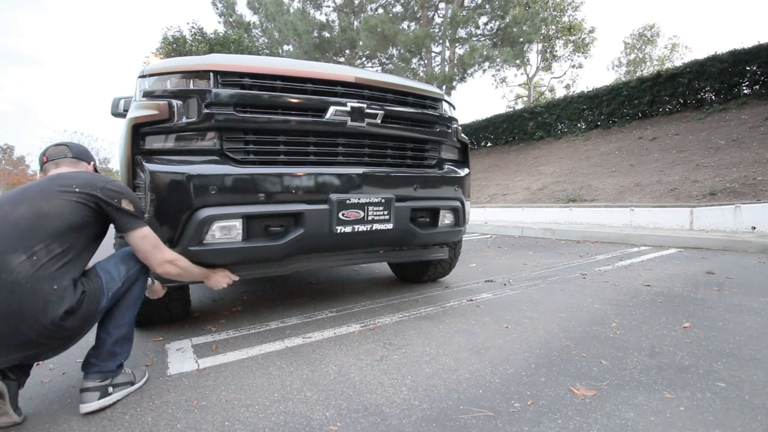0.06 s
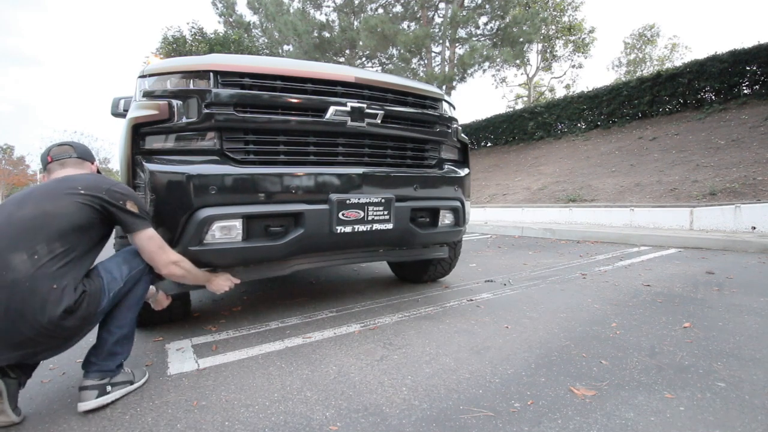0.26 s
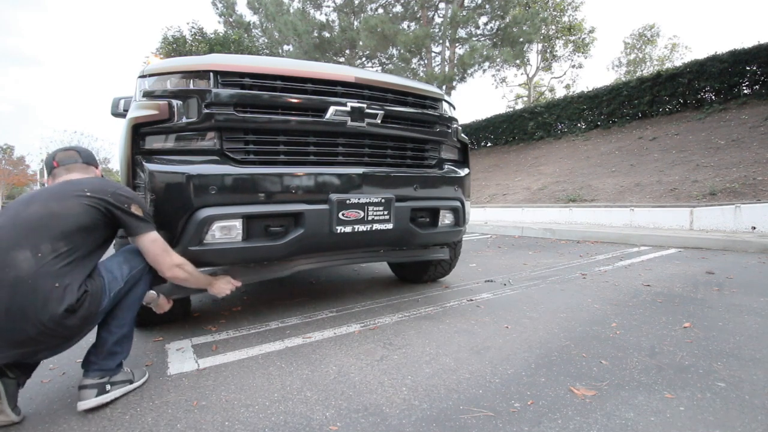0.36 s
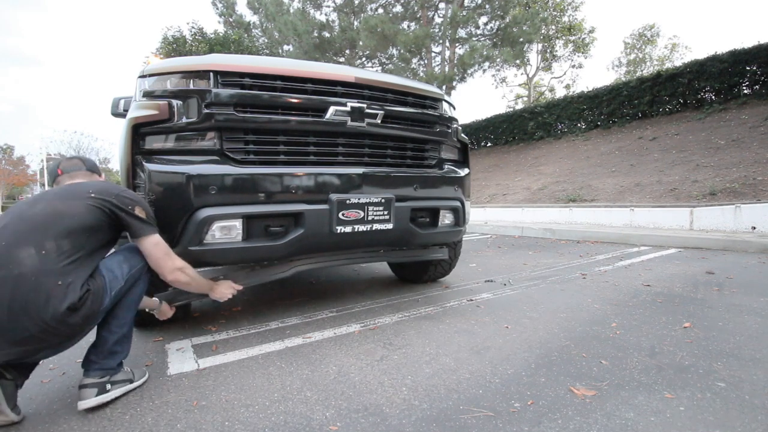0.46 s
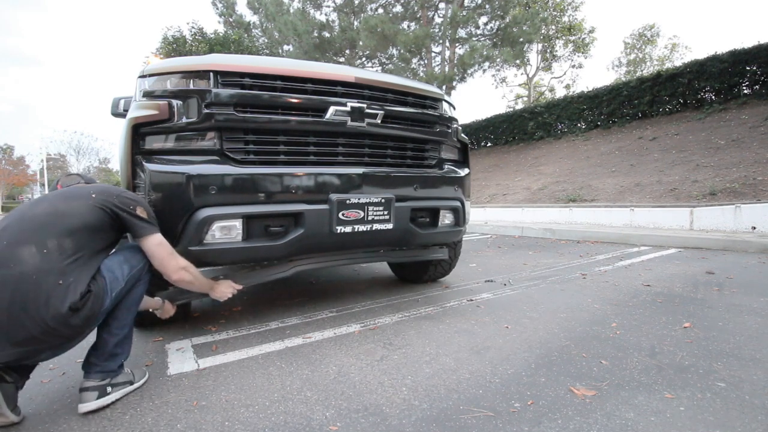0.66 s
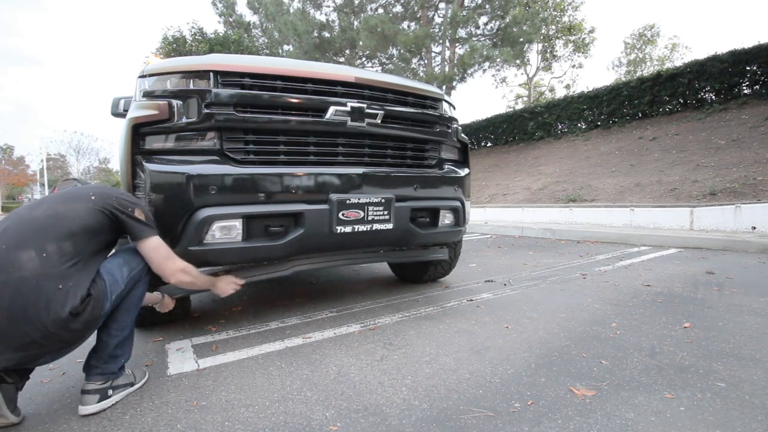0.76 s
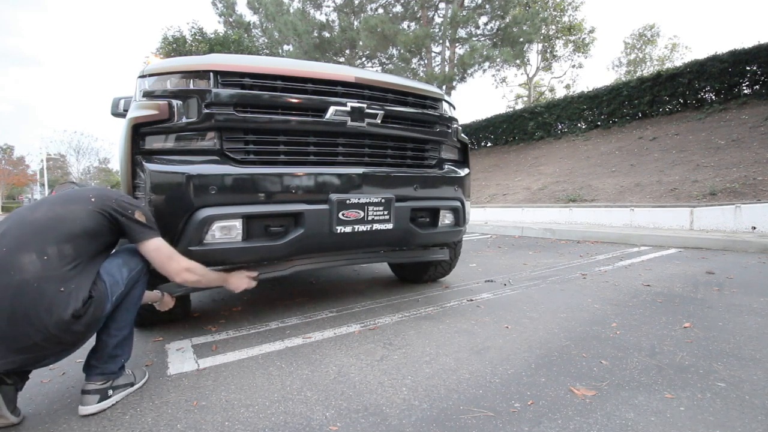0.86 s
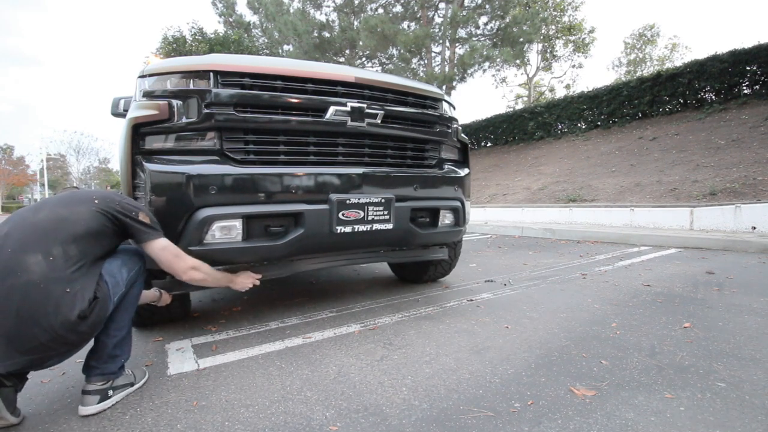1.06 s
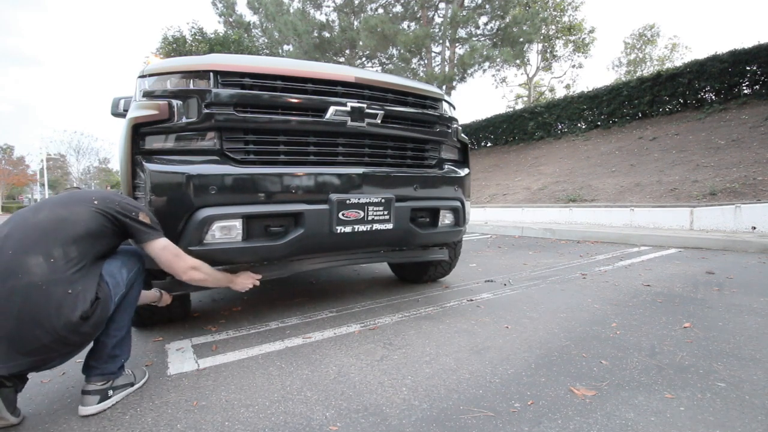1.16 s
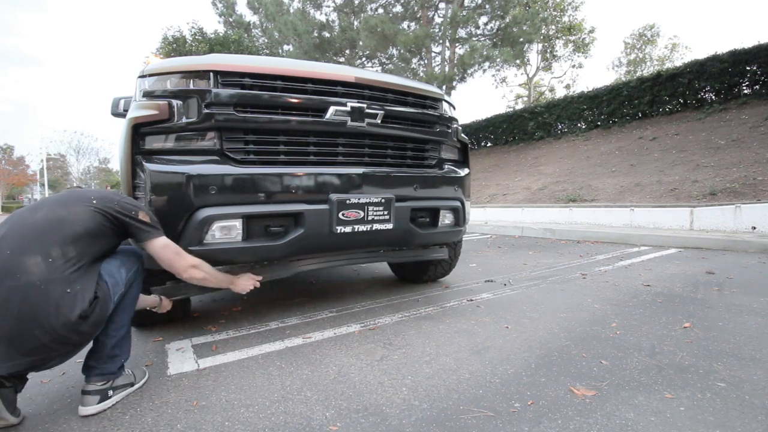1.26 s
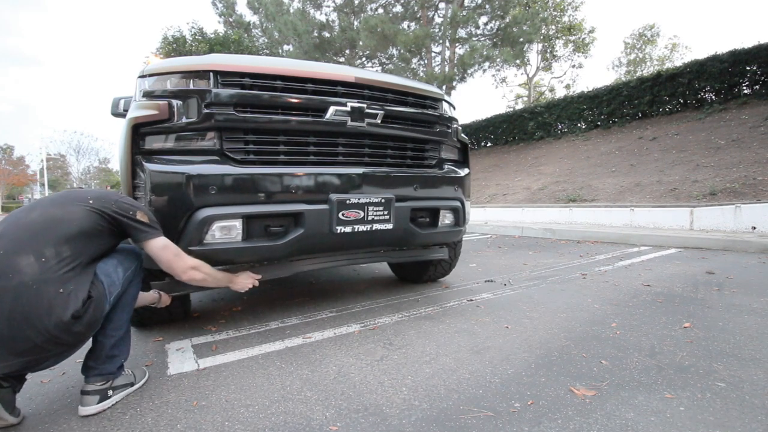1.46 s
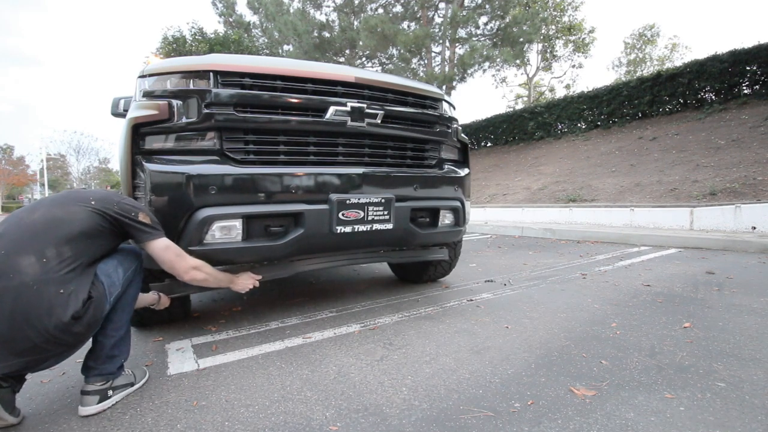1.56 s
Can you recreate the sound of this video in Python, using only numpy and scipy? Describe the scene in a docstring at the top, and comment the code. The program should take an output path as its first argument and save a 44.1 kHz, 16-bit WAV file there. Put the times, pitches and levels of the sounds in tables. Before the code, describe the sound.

A plastic panel pops loose from a truck, knocking and clacking sharply, then settling with ticks

```python
"""Truck panel tugged loose

A plastic panel is tugged loose under the front of a truck in an open car park. Clips pop free and it knocks
on its mounts, then shivers and settles with small ticks: struck decaying modes plus bursts of bright noise.
Sliding is grainy banded noise. Far traffic rumbles as banded noise; a distant machine hums in wavering sines."""
import sys
import numpy as np
from scipy import signal
from scipy.fft import rfft, irfft
from scipy.io import wavfile

SR = 44100
rng = np.random.default_rng(int(sys.argv[2]) if len(sys.argv) > 2 else 0)


def wav_record(signal):
    """Record a signal, one row per channel, as 16-bit PCM in the file named by sys.argv[1]."""
    frames = np.transpose(np.atleast_2d(signal))
    bounded = np.clip(frames, -1, 1)
    # unit amplitude maps onto the largest positive 16-bit level
    quanta = np.round(bounded * 32767).astype(np.int16)
    wavfile.write(sys.argv[1], SR, quanta)


N = 70560

# Modes of the plastic panel. Each row: pitch in Hz, relative level in dB.
PANEL_MODES = [(95, -7), (135, -2.5), (175, -2), (200, -2), (267, 1), (320, 5), (428, -13), (500, 6),
               (590, 7), (700, -1.5), (800, 3.5), (930, 13), (1050, 13), (1200, 11.5), (1400, 13),
               (1600, 11), (1950, 6), (2400, 9.5), (2850, 9), (3400, 11), (3850, 10.5), (6200, 2)]
TWIN_RATIO = 1.06   # each mode has a twin a little higher
MODES = PANEL_MODES + [(hz * TWIN_RATIO, db) for hz, db in PANEL_MODES]
T60_AT_500_HZ_S, T60_SLOPE = 0.066, -0.7


def from_db(db):
    """Decibels to an amplitude factor."""
    return 10 ** (np.asarray(db) / 20)


def rms_one(x):
    """Scale to rms 1."""
    return x / np.sqrt(np.mean(x ** 2) + 1e-20)


def at_hz(points, hz):
    """Read a (Hz, value) outline, linear in log frequency."""
    points = np.array(points)
    return np.interp(np.log(hz), np.log(points[:, 0]), points[:, 1])


def drift(pole_hz):
    """Slow chance with spread 1: noise through two equal poles, computed every 40 samples."""
    r = np.exp(-2 * np.pi * pole_hz * 40 / SR)
    white = rng.standard_normal(N // 40 + 2002)
    slow = signal.lfilter([1], [1, -2 * r, r * r], white)[2000:]
    return np.interp(np.arange(N) / 40, np.arange(len(slow)), rms_one(slow))


def ring(x, hz, t60_s):
    """Two-pole resonator: a unit click sets a decaying sine of height 1 ringing."""
    r, w = from_db(-60 / (t60_s * SR)), 2 * np.pi * hz / SR
    return signal.lfilter([0, np.sin(w)], [1, -2 * r * np.cos(w), r * r], x + 1e-18)


def mode_t60_s(hz):
    """Higher panel modes die sooner."""
    return T60_AT_500_HZ_S * (hz / 500) ** T60_SLOPE


def colour(x, spectrum):
    """Shape a sound by a (Hz, dB) outline."""
    hz = np.linspace(1, SR / 2, len(x) // 2 + 1)
    return irfft(rfft(x) * from_db(at_hz(spectrum, hz)), len(x))


def banded_noise(spectrum, patchy_db):
    """Half-octave bands of stereo noise, each with its own level, flicker and left-right likeness; rms 1."""
    # Each row: Hz, left-right likeness (1 same, -1 opposite).
    likeness = [(60, 0.97), (180, 0.99), (550, 0.87), (1650, 0.38), (4970, -0.4), (15000, 0.52)]
    out, edges_hz = 0, 20 * 2 ** np.arange(0, 10, .5)
    white = rng.standard_normal((2, 2, N))   # neighbouring bands use different noise
    for k, (low_hz, high_hz) in enumerate(zip(edges_hz, edges_hz[1:])):
        band = signal.butter(2, [low_hz, high_hz], "band", fs=SR, output="sos")
        mid, side = signal.sosfilt(band, white[k % 2])
        hz = np.sqrt(low_hz * high_hz)
        alike = np.clip(at_hz(likeness, hz), -1, 1)
        stereo = np.sqrt(1 + alike) * mid + np.sqrt(1 - alike) * side * [[1], [-1]]
        out = out + from_db(at_hz(spectrum, hz) + patchy_db * drift(5.7)) * stereo
    return rms_one(out)


def contact_shapes(starts_s, lengths_s):
    """One smooth push per start, each summing to 1 and the raw hump it came from."""
    t = np.arange(N) / SR - np.array(starts_s)[:, None]
    hump = np.sin(np.pi * np.clip(t / np.array(lengths_s)[:, None], 0, 1) ** 0.82)
    return hump / np.sum(hump, axis=1, keepdims=True), hump


def chatter(starts_s, lengths_s):
    """One short rough contact per start: noise under a hump, energy 1."""
    hump = contact_shapes(starts_s, lengths_s)[1]
    rough = hump * rng.standard_normal(hump.shape)
    return rough / np.sqrt(np.sum(rough ** 2, axis=1, keepdims=True))


def snap(contacts, db):
    """Bright crack of each contact: noise that dies within milliseconds."""
    # Each row: Hz, relative level in dB.
    snap_spectrum = [(1500, -36), (4000, 10), (6000, 9), (9000, 11.5), (12000, 12), (15000, 8.5)]
    t60_s = 0.013
    strength = from_db(db) @ abs(contacts)
    dying = signal.lfilter([1], [1, -from_db(-60 / SR / t60_s)], strength + 1e-18)
    return colour(dying * rng.standard_normal(N), snap_spectrum) / 20


def traffic():
    """Far traffic: steady stereo noise in flickering bands."""
    # Each row: Hz, relative band level in dB.
    traffic_bands = [(25, -27), (50, -3), (110, 2.5), (220, -5.5), (500, -25.5), (1000, -16), (2000, -42),
                     (4000, -54), (6000, -34.5), (9000, -36), (16000, -38)]
    return from_db(-45) * banded_noise(traffic_bands, patchy_db=1.0)


def hum():
    """Distant machine: steady low sines whose levels waver slowly."""
    # Each row: Hz, rms level in dB before waver and stereo balance.
    hum_tones = [(70, -47.5), (140, -58), (231.5, -56), (463, -59)]
    waver_db, waver_pole_hz = 2., 3.
    t = np.arange(N) / SR
    out = 0
    for hz, db in hum_tones:
        height = np.sqrt(2) * from_db(db + waver_db * drift(waver_pole_hz))
        out = out + height * np.sin(2 * np.pi * (hz * t + rng.random()))
    return out


def grit():
    """Brief random surges, each decaying exponentially, that make a slide grainy."""
    grit_per_s, grit_db, decay_s = 2500, -7, .001
    hits = (rng.random(N) < grit_per_s / SR) * rng.exponential(1, N) * from_db(grit_db)
    return rms_one(1 + signal.lfilter([1], [1, -np.exp(-1 / (decay_s * SR))], hits))


def rustle(level_db):
    """Panel sliding on its mounts: banded noise made grainy by grit."""
    # Each row: Hz, relative band level in dB.
    rustle_bands = [(700, -39), (1500, -10), (3500, -10.5), (6300, -20), (9000, -22.5), (16000, -42)]
    return from_db(level_db) * grit() * banded_noise(rustle_bands, patchy_db=1.5)


def rattle(level_db):
    """Loose panel shaking: dense random taps, drawn afresh for each mode, ring the modes briefly."""
    taps_per_s, spread_db, tilt_db_per_octave = 1500, 1.5, -5.5
    out = 0
    for hz, _ in MODES:
        taps = (rng.random(N) < taps_per_s / SR) * from_db(spread_db * rng.exponential(1, N))
        taps = taps * rng.choice([-1, 1], N)
        tilt = from_db(tilt_db_per_octave * abs(np.log2(hz / 500)))
        out = out + tilt * rms_one(ring(taps, hz, mode_t60_s(hz) / 2))
    return from_db(level_db) * rms_one(out)


def ticks():
    """Small ticks of clips and grit: each a brief cluster of rings and a crack."""
    # Each row: start in seconds, low ring in Hz, its relative level in dB, relative crack level in dB.
    tick_list = [(0.0528, 2500, -35, -37), (0.0624, 2100, -34, -41), (.070, 2080, -30, -39),
                 (0.0852, 2610, -33.5, -37), (0.1, 2400, -32.5, -41), (.113, 2500, -68, -57),
                 (0.136, 2280, -34, -42), (0.1489, 2800, -22.5, -54), (.645, 3780, -36, -33.5),
                 (0.7084, 6100, -30.5, -26.5), (0.7539, 4750, -29.5, -28.5), (0.821, 2930, -66, -39),
                 (0.835, 3040, -52, -38), (0.9365, 2050, -27, -30.5), (0.97, 2000, -55.5, -43),
                 (1.186, 2160, -35, -60)]
    # Each row: ratio to the low ring, relative level in dB.
    partials = [(.4, -16), (1, -1), (1.27, -7.5), (1.75, -9)]
    t60_s, chatter_s, push_cycles = 0.0044, 0.0017, 0.44
    start_s, ring_hz, ring_db, bright_db = np.transpose(tick_list)
    rough = chatter(start_s, np.full(len(start_s), chatter_s))
    push = contact_shapes(start_s, push_cycles / ring_hz)[0]
    out = snap(rough, bright_db)
    for x, hz, db in zip(push + rough / 2, ring_hz, ring_db):
        cluster = sum(from_db(part_db) * ring(x, hz * ratio, t60_s) for ratio, part_db in partials)
        out = out + from_db(db) * cluster
    return out


def blows():
    """Clips popping and knocks on mounts: soft pushes ring low modes, chatter rings high ones, plus cracks."""
    # Each row: start in seconds, chatter in seconds, thud in Hz, thud in dB, knock in Hz, knock in dB,
    # clack in Hz, clack in dB, snap in dB; levels are relative.
    blow_list = [(0.1954, 0.0017, 120, -28, 640, -40, 2340, -34.5, -22),
                 (0.1990, 0.0081, 273, -13, 790, -22, 2120, -40, -35),
                 (0.216, 0.006, 165, -9, 605, -30.5, 2050, -33, -55),
                 (0.226, 0.0044, 194, -23, 430, -33, 3240, -36, -53),
                 (0.2349, 0.0037, 128, -15.5, 700, -45, 2590, -30.5, -31),
                 (0.2866, 0.002, 178, -51, 546, -43, 2500, -35.5, -22.5),
                 (0.2915, 0.003, 184.6, -54, 565, -28.5, 2046, -52, -38),
                 (0.3209, .0045, 237, -3.5, 936, -15.5, 1950, -11.5, -7),
                 (0.327, 0.0018, 260, -30, 550, -20.5, 3870, -20, -29),
                 (0.339, 0.0052, 205, -13, 610, -56, 2020, -38, -63),
                 (0.354, 0.0059, 87, -9.5, 600, -30, 4970, -31, -48),
                 (0.3718, 0.0042, 285, -19.5, 900, -33, 2170, -19, -20.5),
                 (.380, 0.003, 308, -40, 610, -22.5, 2500, -25.5, -25),
                 (0.397, 0.0046, 91.5, -8.5, 500, -31, 2000, -43, -53),
                 (0.459, 0.0044, 142, -13, 625, -20, 1930, -18.5, -29),
                 (0.4658, 0.0036, 143, -23.5, 968, -14.5, 3900, -9.5, -10.5),
                 (.481, 0.0031, 206, -15.5, 570, -50, 2070, -30, -44),
                 (0.503, 0.0012, 234, -57, 585, -35, 3770, -51, -37),
                 (0.516, 0.0054, 203, -43, 600, -32, 2840, -33, -37),
                 (0.544, 0.0049, 200, -52, 960, -33.5, 2040, -39, -64.5),
                 (0.5498, 0.0027, 200, -32, 560, -21, 2030, -52, -60),
                 (0.569, 0.0096, 129, -19.5, 424, -43, 2000, -52, -66),
                 (0.585, 0.0036, 100, -28, 590, -29.5, 2000, -50, -66)]
    thud_top_hz, knock_top_hz = 370, 1400   # modes below are thud, then knock, then clack
    away_db_per_octave = 18.5   # modes fade away from the pitch a blow favours
    push_cycles = 0.51          # push length in cycles of the thud
    snap_longest_s = 0.0032     # only the start of a contact cracks
    start_s, length_s, thud_hz, thud_db, knock_hz, knock_db, clack_hz, clack_db, snap_db = (
        np.transpose(blow_list))
    rough = chatter(start_s, length_s)
    push = contact_shapes(start_s, push_cycles / thud_hz)[0]
    tone = abs(rfft(rough, axis=1))
    out = snap(chatter(start_s, np.minimum(length_s, snap_longest_s)), snap_db)
    for k, (hz, db) in enumerate(MODES):
        low = hz < thud_top_hz
        if low:
            aim_hz, aim_db = thud_hz, thud_db
        elif hz < knock_top_hz:
            aim_hz, aim_db = knock_hz, knock_db
        else:
            aim_hz, aim_db = clack_hz, clack_db
        gains = from_db(db + aim_db - away_db_per_octave * abs(np.log2(hz / aim_hz)))
        if low or hz > knock_top_hz:
            gains = gains * (-1) ** (k % len(PANEL_MODES))   # alternate signs; twins match
        if not low:
            gains = gains / (0.41 + tone[:, int(hz * N / SR)])   # partly evens out the luck of the chatter
        out = out + ring(gains @ (push if low else rough), hz, mode_t60_s(hz)) / 2
    return out


def wash():
    """Stereo echo of truck body and walls: decaying banded noise."""
    # Each row: Hz, relative band level in dB.
    wash_bands = [(60, -6), (600, 0), (1500, -8), (3000, -24), (16000, -32)]
    level_db, t60_s, rise_s = -19, 0.15, 0.0037
    width = 0.43   # share of the left-right difference kept
    t = np.arange(N) / SR
    echo = banded_noise(wash_bands, patchy_db=1.0) * from_db(-60 * t / t60_s) * np.clip(t / rise_s, 0, 1)
    middle = echo.mean(axis=0)
    echo = middle + width * (echo - middle)
    return from_db(level_db) * echo / np.sqrt(np.sum(echo ** 2) / 2)


def heard_from_left(x):
    """Source to the left: the right port hears it later and duller, both hear the wash."""
    lag_s, right_db, shade_hz = 7.2e-5, -.6, 7300
    phase_top_rad = 2.6   # the phase lag levels off in the treble
    hz = np.linspace(0, SR / 2, N // 2 + 1)
    phase_rad = phase_top_rad * np.tanh(2 * np.pi * hz * lag_s / phase_top_rad)
    shade = from_db(right_db) / np.sqrt(1 + (hz / shade_hz) ** 4)
    right = irfft(rfft(x) * shade * np.exp(-1j * phase_rad), N)
    return np.array([x, right]) + signal.fftconvolve(wash(), x[None], axes=1)[:, :N]


def scene():
    """Panel and ticks close by on the left, traffic and hum far off."""
    # Shaking and sliding. Each row: time in seconds, rattle level in dB, rustle level in dB.
    shiver = [(0, -52.5, -54.5), (.04, -51.5, -60), (.09, -53, -51), (.13, -56, -54), (0.191, -46, -58),
              (0.201, -19.5, -42.5), (0.243, -37, -32), (.28, -36, -49.5), (0.299, -31, -38),
              (.34, -28, -31.5), (0.383, -21, -37), (0.448, -31, -41), (.48, -23, -32), (.52, -29.5, -32.5),
              (.57, -35, -44.5), (.61, -39, -49.5), (.72, -41.5, -54), (.82, -47, -58.5), (.85, -44, -50),
              (.9, -48.5, -49.5), (.915, -52.5, -56.5), (1.04, -50.5, -59.5), (1.07, -51, -56),
              (1.12, -51, -62.5), (1.6, -53.5, -63)]
    time_s, rattle_db, rustle_db = np.transpose(shiver)
    t = np.arange(N) / SR
    far = (traffic() + hum()) * from_db([[.5], [-.5]])   # left slightly louder
    slide = rustle(np.interp(t, time_s, rustle_db))
    near = rattle(np.interp(t, time_s, rattle_db)) + ticks() + blows()
    return heard_from_left(near) + slide + far


def record(dry):
    """The microphone drops the lowest bass, the loudest peaks flatten, the top is cut."""
    low_hz, cutoff_hz = 51, 15700
    thin = signal.sosfilt(signal.butter(2, low_hz, "high", fs=SR, output="sos"), dry)
    top_cut = signal.ellip(10, .1, 80, cutoff_hz, fs=SR, output="sos")
    return signal.sosfilt(top_cut, np.clip(thin, -1, 1))


dry = scene()
out = record(dry)
wav_record(out)
```